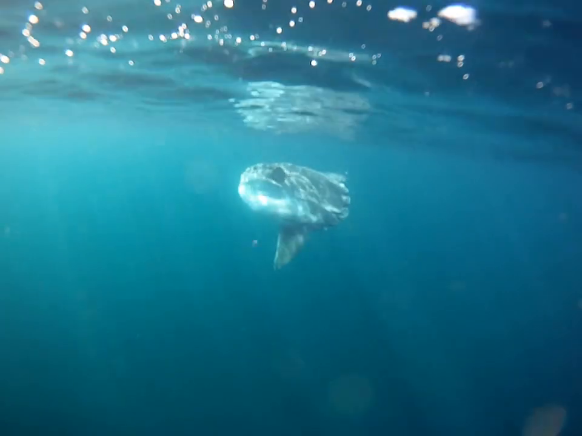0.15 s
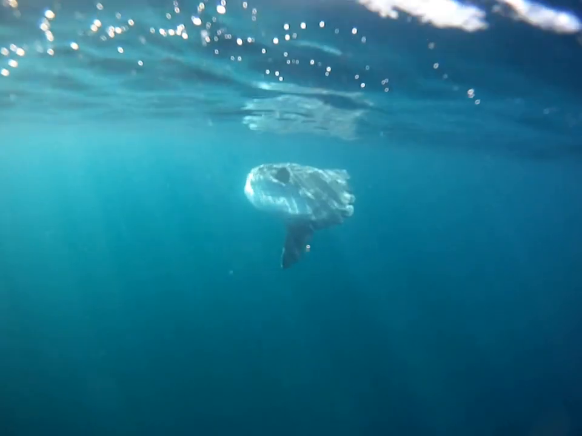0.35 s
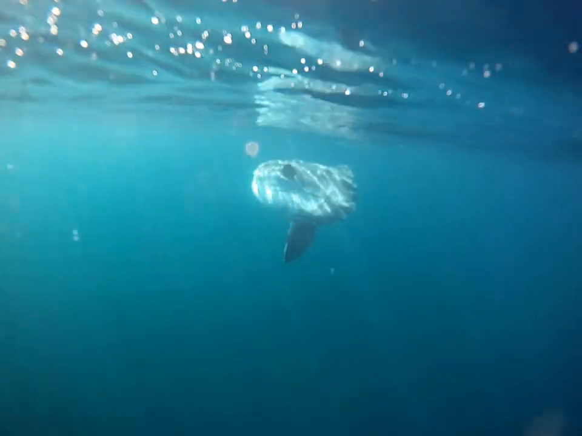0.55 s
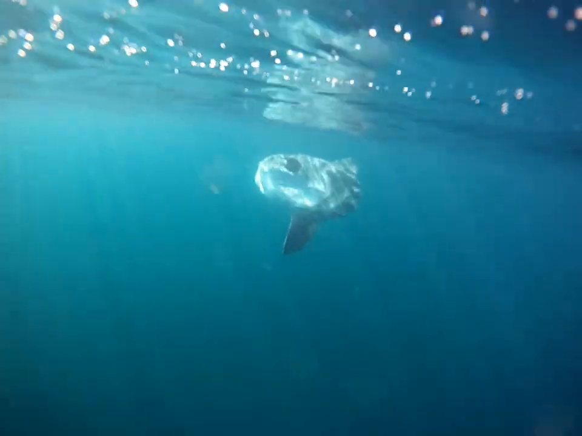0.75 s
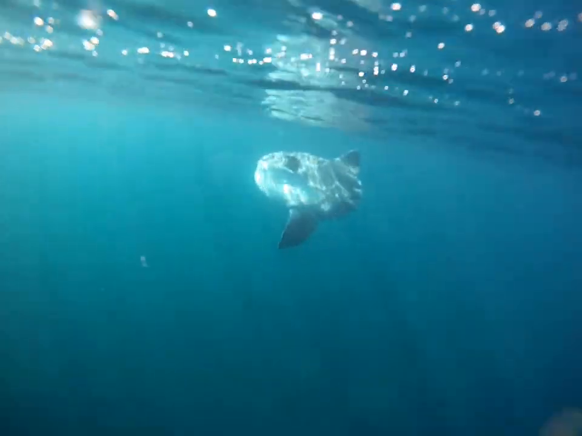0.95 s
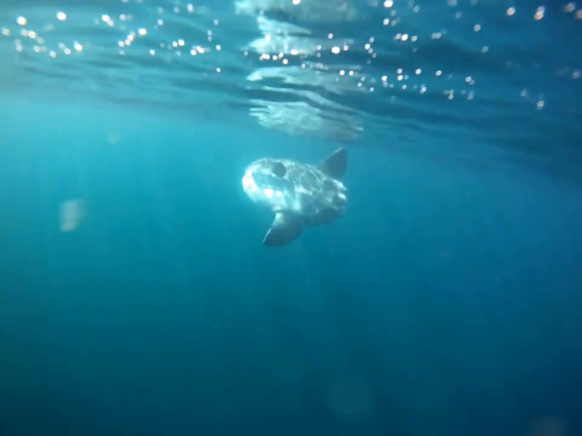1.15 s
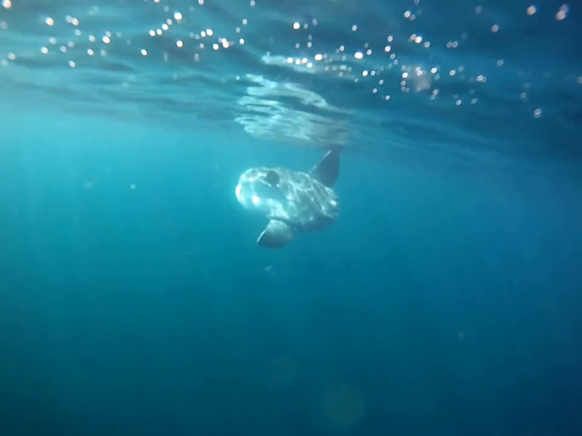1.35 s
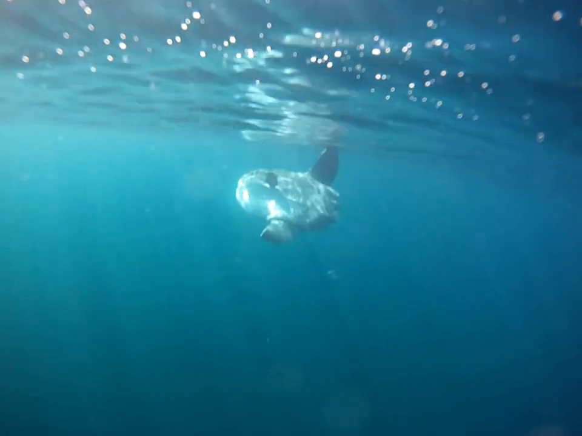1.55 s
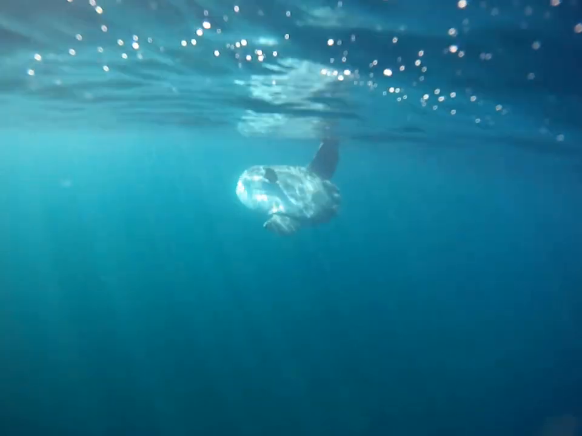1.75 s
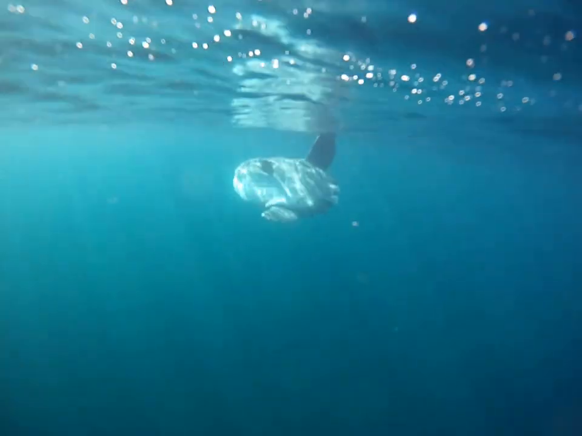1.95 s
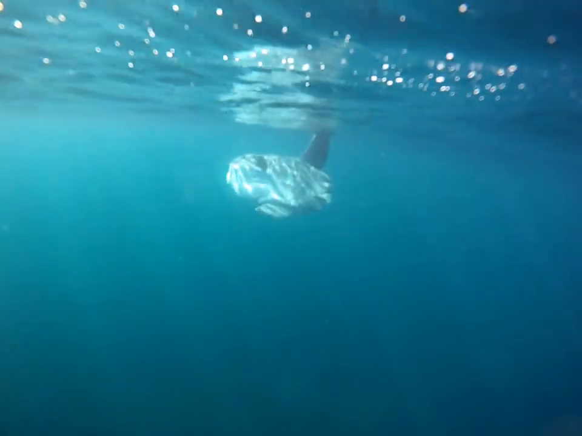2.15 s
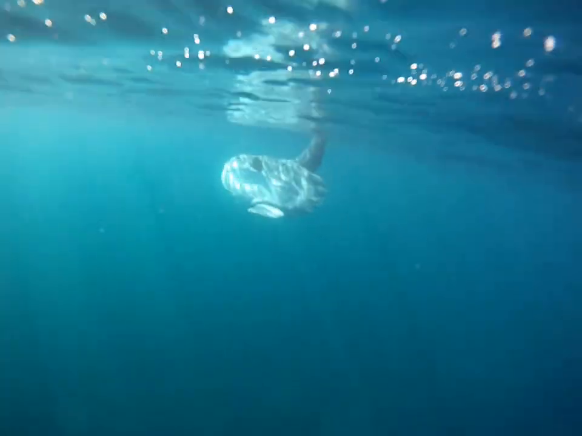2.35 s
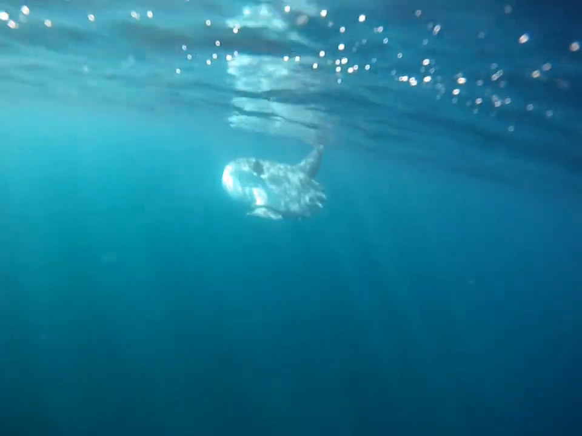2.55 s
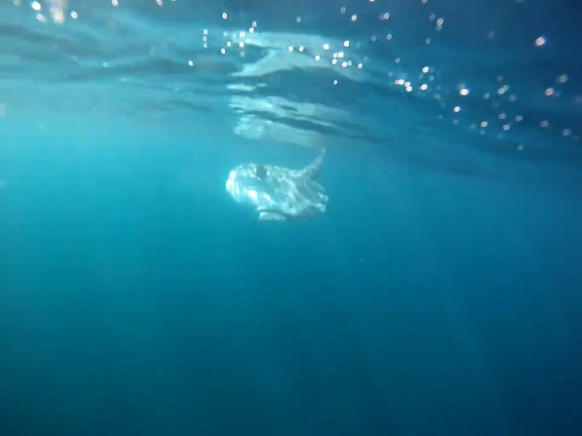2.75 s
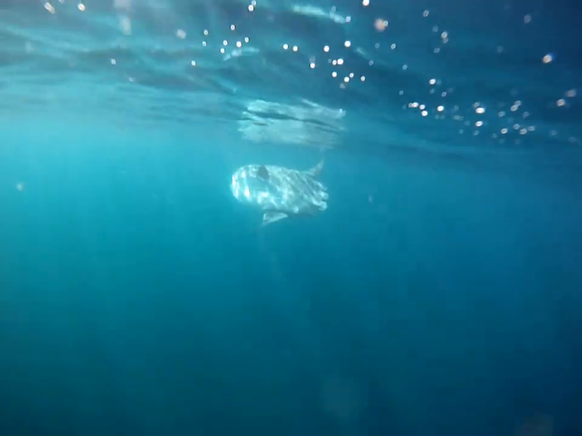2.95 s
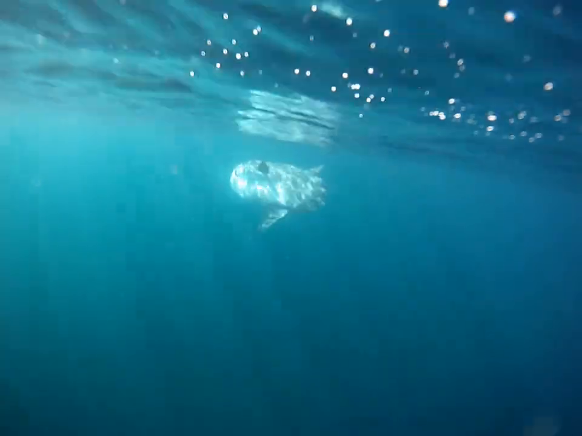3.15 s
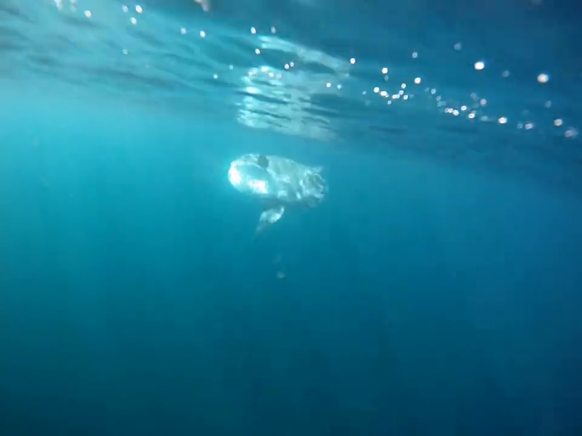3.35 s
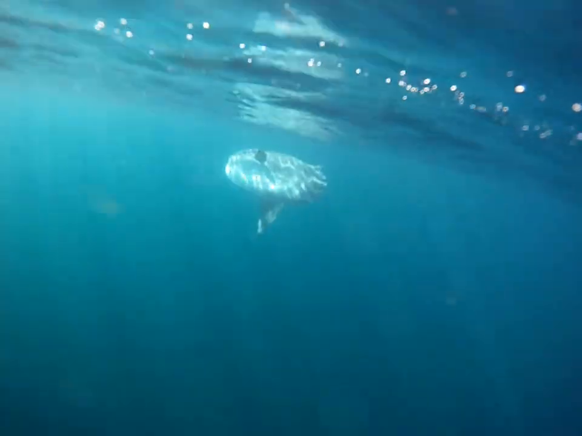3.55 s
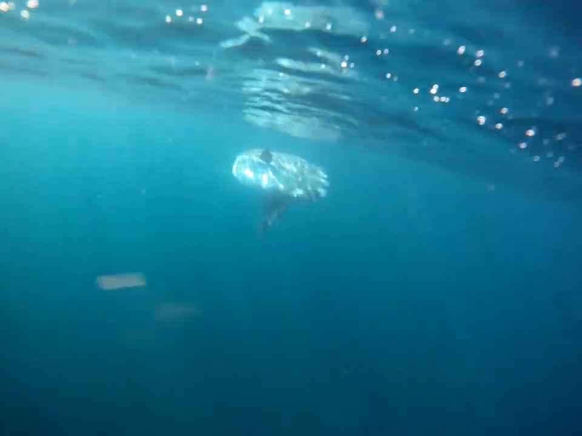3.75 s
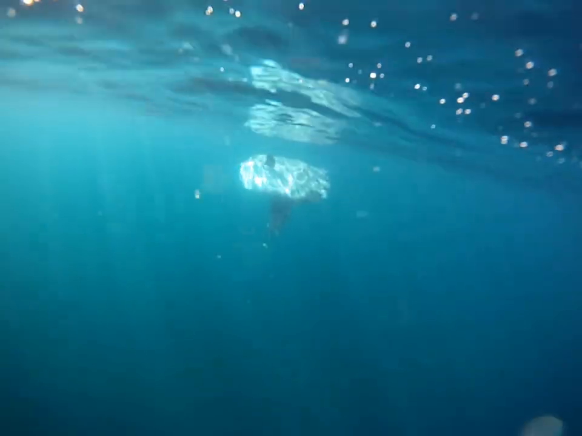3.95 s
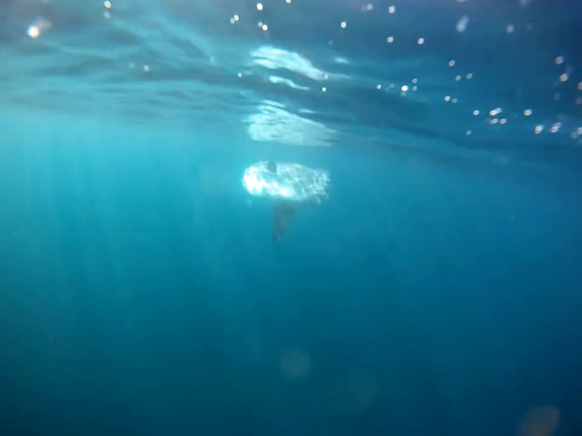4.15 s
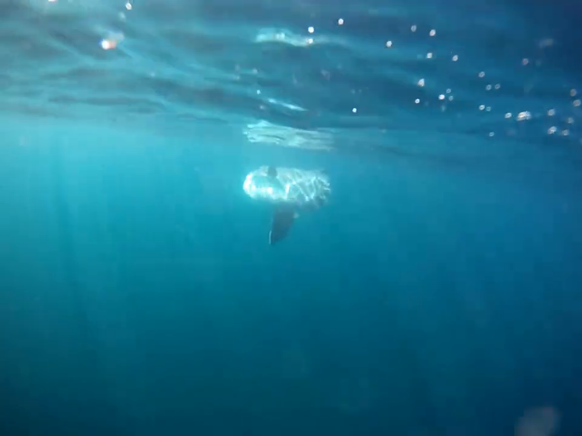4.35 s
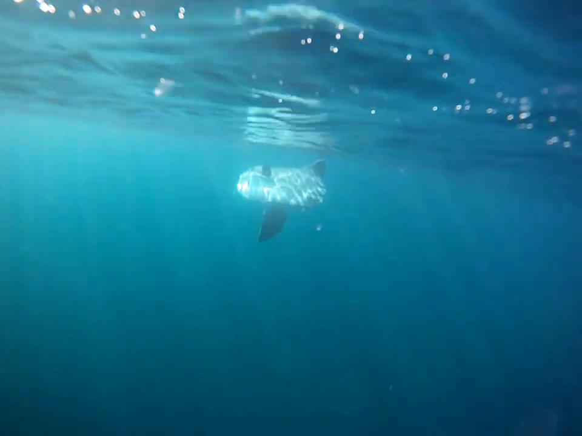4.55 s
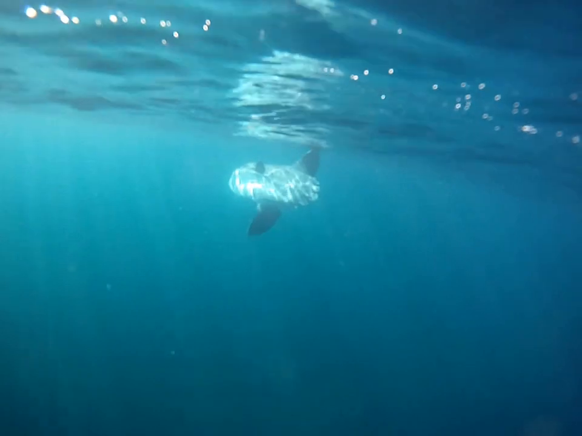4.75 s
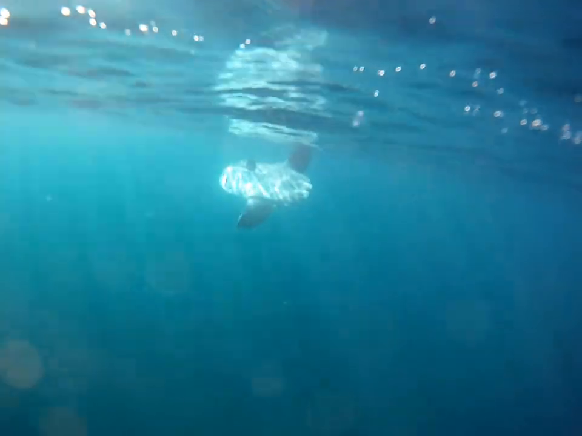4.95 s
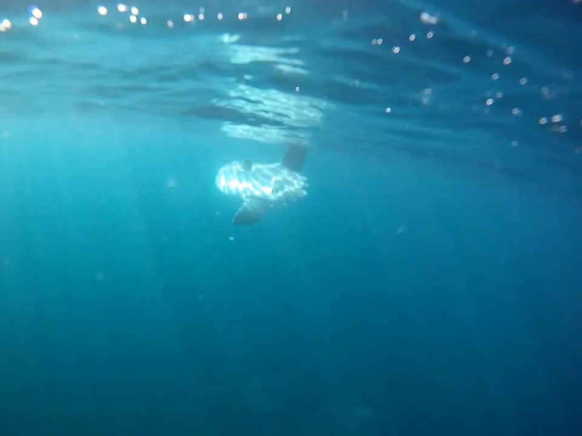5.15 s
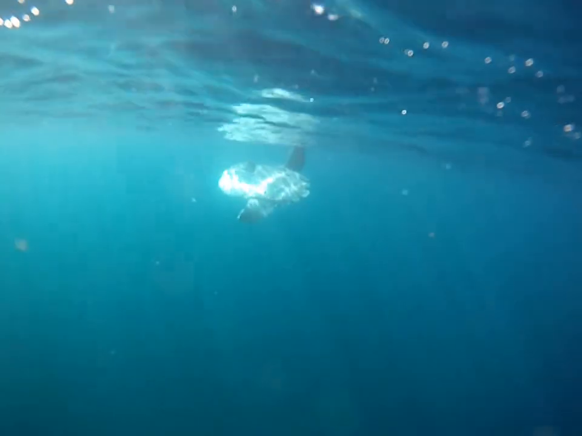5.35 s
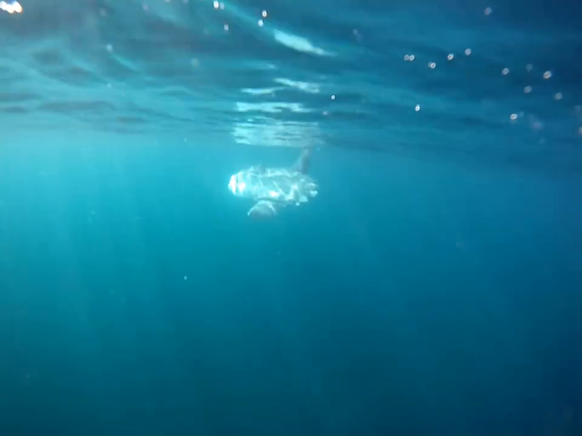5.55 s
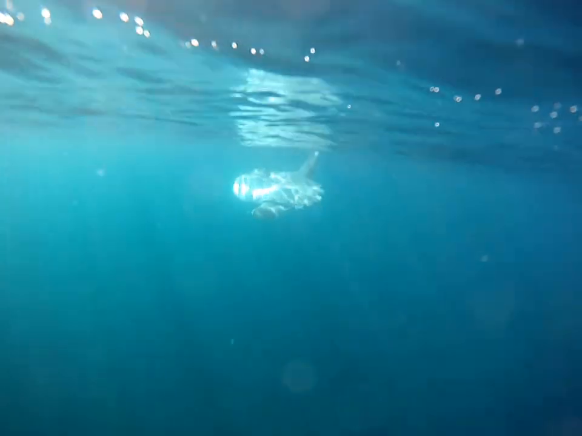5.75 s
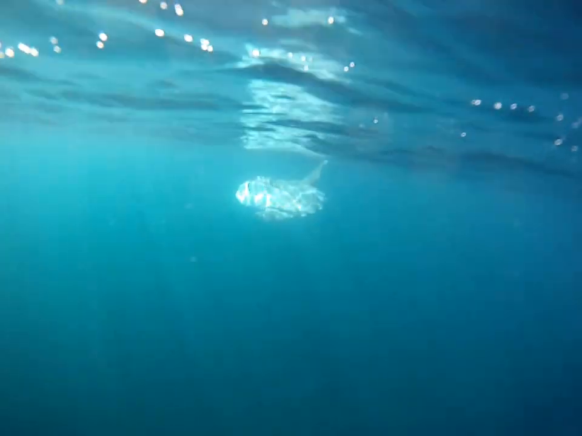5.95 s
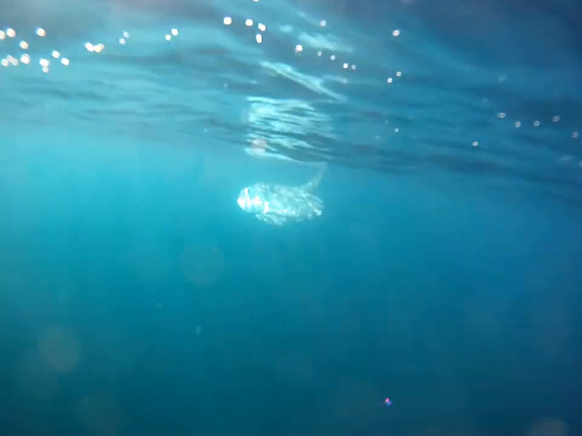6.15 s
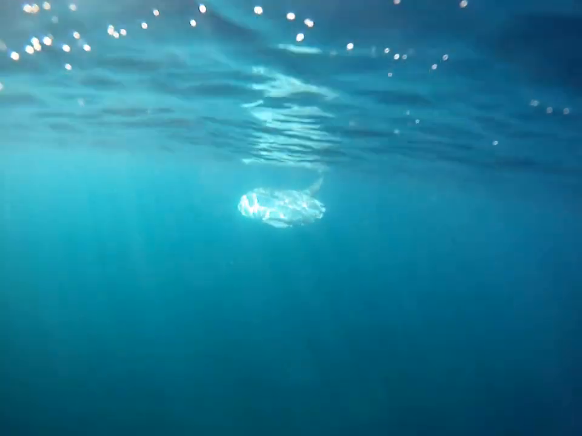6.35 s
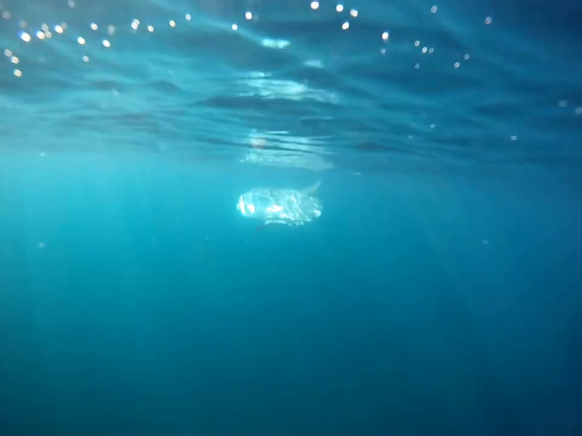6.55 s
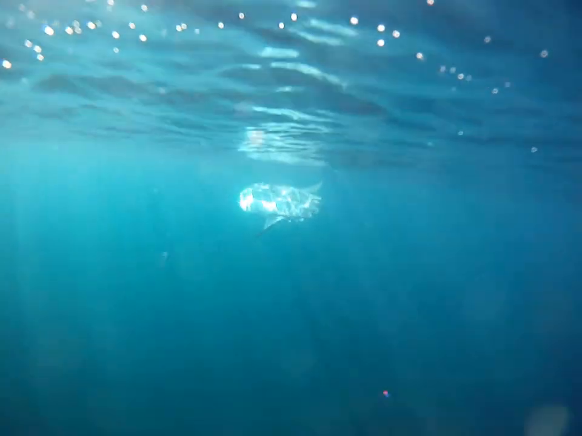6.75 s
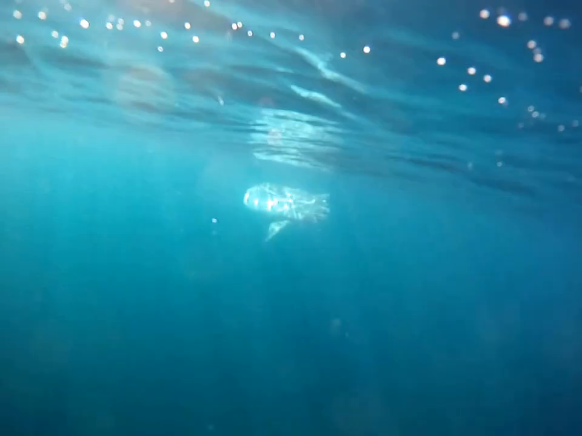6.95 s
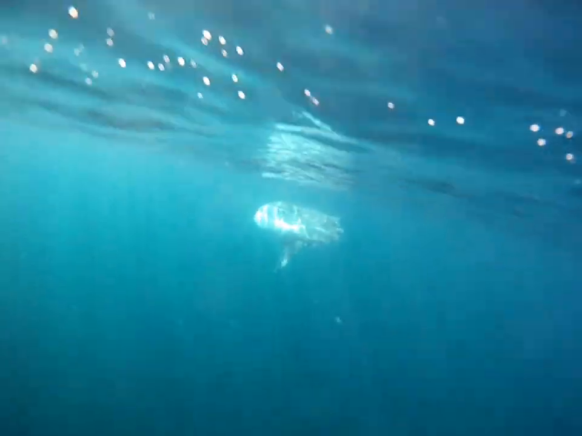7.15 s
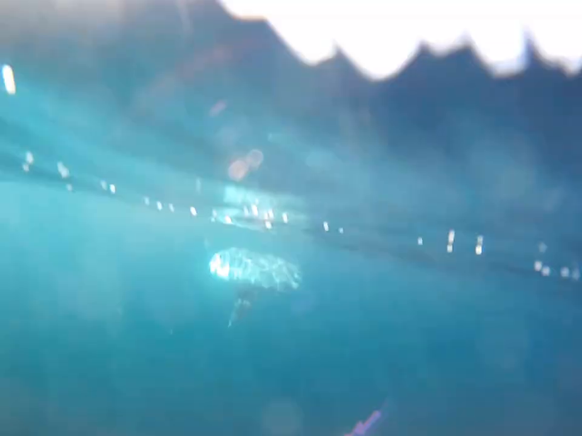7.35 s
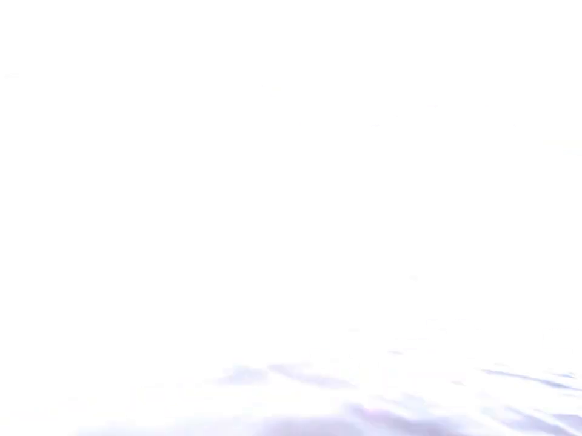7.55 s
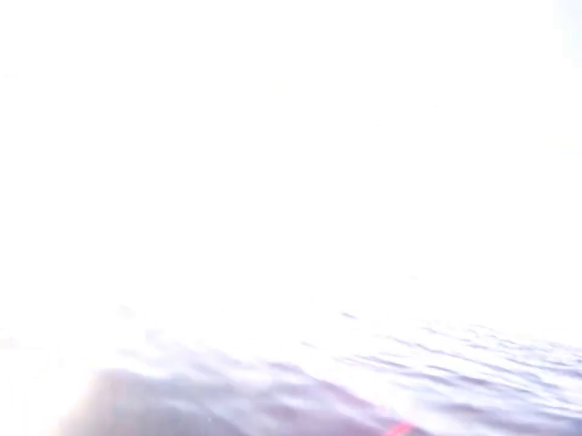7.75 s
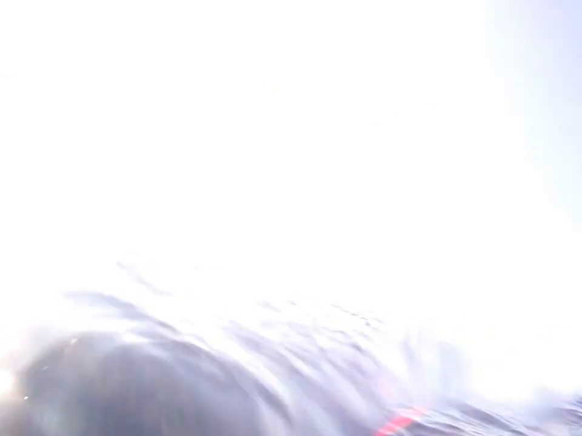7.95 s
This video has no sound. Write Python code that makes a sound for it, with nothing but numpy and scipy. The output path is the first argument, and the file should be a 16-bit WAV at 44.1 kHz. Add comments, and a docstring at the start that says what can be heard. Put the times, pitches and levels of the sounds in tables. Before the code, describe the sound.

A submerged microphone hears deep surging water and faint wash, a sharp click, then abrupt wet clacks and bubbling as it breaks the surface.

```python
"""Just under the sea surface beside a boat, a small camera in a sealed housing is held, then lifted out.
Noise driving resonances makes the swell's rumble and the water's hiss; knocks and heaves are damped low swings.
Water ticks on the shell; air pockets and short rings of the shell are gliding sines: a few early rings,
most around the lift. Fizz is many tiny ringing bubbles in spray and draining film; the seal pops twice as
the port clears. The recorder samples slowly and holds each sample."""
import sys
import numpy as np
from scipy import signal
from scipy.io import wavfile
from scipy.ndimage import uniform_filter1d

SR = 44100
rng = np.random.default_rng(int(sys.argv[2]) if len(sys.argv) > 2 else 0)


def bounce(signal):
    """Save signal as a 16-bit WAV file at the path given by the first command-line argument."""
    frames = np.transpose(np.atleast_2d(signal))
    limited = np.clip(frames, -1, 1)
    pcm = np.round(limited * 32767).astype(np.int16)
    wavfile.write(sys.argv[1], SR, pcm)


def field_ratio(decibels):
    """Amplitude ratio for a level in dB (20 dB per decade); scalars and array-likes work."""
    return 10 ** (np.asarray(decibels, dtype=float) / 20)


N = 356767  # length in samples, about 8.1 s

# the housing leaves the water: start and duration
LIFT_S, LIFT_TAKES_S = 7.3, 0.31


def lifted():
    """How far the housing is out of the water: 0 under water, 1 in air."""
    return np.clip((np.arange(N) / SR - LIFT_S) / LIFT_TAKES_S, 0, 1)


def rms_one(x):
    """Scale a sound to an average strength (rms) of 1."""
    return x / np.sqrt(np.mean(x ** 2) + 1e-20)


def in_time(rows):
    """Draw straight lines between the table's points, one curve for each column after the time."""
    s, *columns = np.transpose(rows)
    return [np.interp(np.arange(N) / SR, s, c) for c in columns]


def add(out, start_s, sound):
    """Mix a short sound into out at its start time, cutting it off at the end."""
    at = round(start_s * SR)
    out[at:at + len(sound)] += sound[:N - at]


def drift(rate_hz):
    """Slow random wandering of rms 1: noise at every 40th sample, smoothed twice, then joined by lines."""
    r = np.exp(-80 * np.pi * rate_hz / SR)
    noise = rng.standard_normal(N // 40 + 2002)
    slow = signal.lfilter([1], [1, -2 * r, r * r], noise)[2000:]  # drop the settling-in
    return np.interp(np.arange(N) / 40, np.arange(len(slow)), rms_one(slow))


def resonate(x, hz, width_hz):
    """A two-pole resonance that passes its own pitch at gain 1 and weakens the rest."""
    r = np.exp(-np.pi * width_hz / SR)
    gain = (1 - r * r) / 2
    return signal.lfilter(gain * np.array([1, 0, -1]), [1, -2 * r * np.cos(2 * np.pi * hz / SR), r * r], x)


def ring(x, hz, t60_s):
    """A unit click sets a sine of height 1 ringing; it falls 60 dB in t60_s."""
    r, w = field_ratio(-60 / (t60_s * SR)), 2 * np.pi * hz / SR
    return signal.lfilter([0, np.sin(w)], [1, -2 * r * np.cos(w), r * r], x + 1e-18)


def noise_in_modes(modes, lumpy_db, lump_rate_hz):
    """Separate noise drives each resonance; their wandering levels are partly shared; the sum has rms 1."""
    out, shared = 0, drift(lump_rate_hz)
    for hz, width_hz, db in modes:
        drive = rng.standard_normal(N + 8000)
        # two passes give steep skirts; each is wider, so that the pair has about the listed width
        once = resonate(drive, hz, 1.53 * width_hz)
        band = resonate(once, hz, 1.53 * width_hz)[-N:]
        lumps = 0.89 * shared + 0.5 * drift(lump_rate_hz)
        out = out + band * field_ratio(db + lumpy_db * lumps)
    return rms_one(out)


# push of the swell on the housing: time_s, push_db
SWELL_PUSH = [(0.0, -51), (0.06, -42), (0.43, -38), (0.45, -37.5), (0.59, -38.5), (1.02, -47),
              (1.85, -36.5), (2.5, -47.5), (2.54, -40.5), (3.36, -42), (3.64, -48.5), (4.19, -36.5),
              (4.84, -46.5), (5.16, -40), (5.63, -42.5), (5.71, -47.5), (5.75, -41), (6.32, -48.5),
              (6.99, -40.5), (7.3, -44.5)]
# resonances of the slow surge: pitch_hz, width_hz, relative_level_db
SURGE_RESONANCES = [(24.8, 9.2, -2), (41.3, 20, -2.5)]
# resonances of the wall layer: pitch_hz, width_hz, relative_level_db
WALL_RESONANCES = [(79.7, 13.7, -1), (98.63, 5.6, 5), (120.4, 13.4, -4.5)]
# resonances of the upper rumble: pitch_hz, width_hz, relative_level_db
UPPER_RESONANCES = [(156.2, 30, 1), (197.5, 51.6, -6), (234.2, 18.1, 0.5), (300, 43, -10.5)]
# resonances of the steadier wash above the rumble: pitch_hz, width_hz, relative_level_db
WASH_RESONANCES = [(375, 72, -3.5), (445, 90, 1), (573, 81, 0.5), (698, 120, -8.5)]
# each layer: level_db at a push of SWELL_MEAN_DB, share of the push's swing it follows, loss_db in air
SWELL_MEAN_DB = -43
SURGE, WALL, UPPER, WASH = (-49.5, 0.79, 0.97), (-45, 1, 13), (-46.5, 0.71, 11.5), (-61.5, 0.37, 8.7)


def rumble():
    """Turbulent pushes of the swell excite the low resonances of the housing."""
    push_db, = in_time(SWELL_PUSH)
    out_of_water = lifted()

    def loudness(level_db, share, loss_db):
        """Let one layer follow the push and weaken in air."""
        return field_ratio(level_db + share * (push_db - SWELL_MEAN_DB) - loss_db * out_of_water)

    surge = loudness(*SURGE) * noise_in_modes(SURGE_RESONANCES, lumpy_db=3.0, lump_rate_hz=11)
    wall = loudness(*WALL) * noise_in_modes(WALL_RESONANCES, lumpy_db=1.5, lump_rate_hz=7.5)
    upper = loudness(*UPPER) * noise_in_modes(UPPER_RESONANCES, lumpy_db=3.0, lump_rate_hz=16.6)
    wash = loudness(*WASH) * noise_in_modes(WASH_RESONANCES, lumpy_db=2.0, lump_rate_hz=8.3)
    return surge + wall + upper + wash


# hiss of the water before the loss in air: time_s, level_db
WATER_HISS = [(0.0, -57), (.5, -57), (1.1, -60), (1.6, -55.5), (2.35, -57), (2.78, -52.5), (3.45, -58),
              (4.25, -53.5), (5.0, -55), (5.9, -57.5), (6.35, -56), (7.04, -56.5)]
# resonances of the housing heard in the hiss: pitch_hz, width_hz, relative_level_db
SHELL_RESONANCES = [(861, 133, -8.5), (1380, 290, -6), (1764, 70, -5.5), (2070, 225, 0), (2370, 146, -6),
                    (2628, 213, -2), (3440, 380, -16.5), (3860, 1100, -19), (4800, 200, -17),
                    (5350, 360, -18)]
HISS_LOSS_DB = 20  # in air


def hiss():
    """Smooth water noise is coloured by the resonances of the shell."""
    level_db, = in_time(WATER_HISS)
    loudness = field_ratio(level_db - HISS_LOSS_DB * lifted())
    return loudness * noise_in_modes(SHELL_RESONANCES, lumpy_db=1.08, lump_rate_hz=2.3)


# dull knocks, and low heaves of the surge: start_s, level_db before build-up and decay, pitch_hz
KNOCKS_AND_HEAVES = [(.385, -27, 348), (.395, -26.5, 70), (.545, -26, 98), (.6, -33, 320),
                     (1.761, -22.5, 138), (1.901, -28, 300), (2.707, -24.5, 43.7), (3.022, -23.5, 59.5),
                     (5.109, -25.5, 43.7), (5.761, -32, 377), (7.0, -22.5, 45), (7.748, -39, 150),
                     (7.868, -37.5, 129), (7.943, -37, 200), (7.986, -35.5, 89)]
KNOCK_CYCLES = 10.1  # cycles to fall 60 dB


def knocks_and_heaves():
    """A soft push, building over about half a cycle, sets a low, heavily damped swing going."""
    out, ms = np.zeros(N), np.arange(12000) * 1000 / SR
    for start_s, db, hz in KNOCKS_AND_HEAVES:
        cycles = ms * hz / 1000
        swing = np.sin(2 * np.pi * cycles) * (1 - np.exp(-cycles / 0.4))
        add(out, start_s, field_ratio(db - 60 * cycles / KNOCK_CYCLES) * swing)
    return out


# ticks of water on the shell: start_s, peak_db, brightness in octaves above 1 kHz
SHELL_TICKS = [(1.14, -42, -0.2), (1.1702, -22, 1.37), (7.06, -31.5, 1), (7.1494, -32.5, 1.75),
               (7.2307, -44, 7), (7.287, -38, 2), (7.317, -15.5, 1.55), (7.3244, -33, 3),
               (7.3745, -18, -1.15), (7.3854, -32, -1.5), (7.4384, -26, 2.5), (7.446, -11, 0.4),
               (7.5155, -31, 1.5), (7.529, -37, 3), (7.539, -27, 3.5), (7.5522, -38, 6), (7.5603, -25.5, 2),
               (7.5688, -7.5, -0.1), (7.59, -33, 0.3), (7.599, -39, -1), (7.6151, -19.5, 4),
               (7.627, -21.5, 2.5), (7.639, -29, 1.2), (7.664, -36, -1.5), (7.6879, -43, 1.4),
               (7.705, -43, 1.1), (7.716, -36.5, 3), (7.7447, -46, 2.5), (7.7743, -39.5, 1.5),
               (7.794, -50, 1.5), (7.8204, -36.5, 2), (7.8524, -32, 3), (7.8604, -34, 2), (7.893, -39, 2.5),
               (7.9186, -39, 1), (7.9414, -49, 6), (7.976, -37, 3), (7.986, -44, 2), (8.0075, -43, -2.2),
               (8.021, -38, 2.5)]
# what a tick on the shell rings with: pitch_hz, relative_level_db, fall_s (time to fall 60 dB)
TICK_RESONANCES = [(620, -15.5, 0.0054), (1334, 6, 0.0084), (1950, 19, 0.0074), (2680, 6, 0.0069),
                   (3140, -6, 0.0067), (3530, 2, 0.01), (4270, -16, 0.0061), (4950, -10, 0.0052),
                   (5470, -4, 0.0051)]
TICK_NARROW_DB = 11  # loss of a mode one octave from the brightness, growing with the square
CONTACT_MS, CONTACT_HALVES_DB = 1.7, 21.5  # fade of a -35 dB tick's contact; it halves for so many dB more
# stray faint drops while the film drains: earliest start, middle level, most either way, how many
STRAY_FROM_S, STRAY_DB, STRAY_SPREAD_DB, STRAY_COUNT = 7.515, -50, 2, 9


def ticks():
    """A short ragged contact strikes the shell; a higher brightness favours the higher modes."""
    out, t = np.zeros(N), np.arange(1500) / SR
    when, loud, bright = rng.random((STRAY_COUNT, 3)).T
    stray_s = STRAY_FROM_S + when * (N / SR - STRAY_FROM_S)
    stray_db = STRAY_DB + STRAY_SPREAD_DB * (2 * loud - 1)
    strays = zip(stray_s, stray_db, 3 * bright)
    for start_s, db, brightness in list(SHELL_TICKS) + list(strays):
        contact_ms = CONTACT_MS * 0.5 ** ((db + 35) / CONTACT_HALVES_DB)
        contact = rng.standard_normal(len(t)) * np.exp(-t / (contact_ms / 1000))
        sound = np.zeros(len(t))
        for hz, mode_db, t60_s in TICK_RESONANCES:
            luck_db = rng.normal(0, 2.5)  # no two ticks sound alike
            loss_db = TICK_NARROW_DB * (np.log2(hz / 1000) - brightness) ** 2
            sound += field_ratio(mode_db + luck_db - loss_db) * ring(contact, hz, t60_s)
        add(out, start_s, field_ratio(db) * sound / np.abs(sound).max())
    return out


# small pockets while the film drains: level at STRAY_FROM_S, most either way, average delay, fade of later ones
SMALL_DB, SMALL_SPREAD_DB, SMALL_THIN_OUT_S, SMALL_FADE_DB_PER_S = -37, 4, 0.1, 40
# lowest pitch, range above it, rise time, cycles to fall 60 dB
SMALL_LOW_HZ, SMALL_OCTAVES, SMALL_RISE_MS, SMALL_CYCLES = 1100, 2.2, 1.1, 18
SMALL_GLIDE, SMALL_COUNT = 0.15, 30  # average upward glide in octaves per 10 ms; how many are drawn


def small_pockets():
    """Small pockets burst at random, thickest just after STRAY_FROM_S; rows as in POCKETS_AND_RINGS."""
    when, loud, pitch, bend = rng.random((SMALL_COUNT, 4)).T
    late_s = -SMALL_THIN_OUT_S * np.log(when)
    hz = SMALL_LOW_HZ * 2 ** (SMALL_OCTAVES * pitch)
    db = SMALL_DB - SMALL_FADE_DB_PER_S * late_s + SMALL_SPREAD_DB * (2 * loud - 1)
    rise_ms = np.full(SMALL_COUNT, SMALL_RISE_MS)
    fall_ms = 1000 * SMALL_CYCLES / hz
    rows = zip(STRAY_FROM_S + late_s, db, hz, rise_ms, fall_ms, 2 * SMALL_GLIDE * bend)
    return [row for row in rows if row[0] < N / SR]


# air pockets and short rings of the shell: start_s, level_db before flutter, pitch_hz at the end of the rise,
# rise_ms, fall_ms (time to fall 60 dB), glide in octaves per 10 ms
POCKETS_AND_RINGS = [(1.14, -37.5, 785, 0.97, 17, 0.018), (1.1701, -28, 1350, 1.9, 22, -0.025),
                     (1.1695, -22, 5550, 2.1, 12, 0.051), (4.034, -41.5, 4240, 1.1, 7.5, .03),
                     (4.601, -46, 3000, 1.1, 6, .03), (7.318, -30, 1216, 3.7, 29, 0.000039),
                     (7.375, -34, 1190, 1.1, 30, -0.068), (7.44, -24, 1990, 2.1, 21, -0.068),
                     (7.446, -7, 1710, 1.35, 19, -0.3), (7.483, -21.5, 946, 3.2, 34, -0.025),
                     (7.514, -24.5, 1700, 0.8, 5.3, .05), (7.519, -28.5, 1100, 2.5, 28, 0.19),
                     (7.533, -31, 2000, 2.2, 14, 0.037), (7.5681, -1, 1568, 4.42, 9.5, 0.24),
                     (7.569, -20, 2970, 2.8, 13, -0.05), (7.575, -12.5, 2030, 4, 34, 0.15),
                     (7.597, -19.5, 1260, 4.5, 25, 0.11), (7.611, -19, 2570, 0.89, 8, 0.053),
                     (7.629, -20.5, 2360, 0.51, 31, 0.051), (7.653, -38, 4580, 1.9, 14, .03),
                     (7.731, -41, 2240, 1.8, 14, 0.061), (7.842, -43, 3360, 1.5, 10, .03),
                     (7.894, -39, 2060, 1, 30, 0.017), (8.0188, -21.5, 1950, 1.7, 5.4, .3),
                     (8.027, -33, 2260, 2.4, 15, 0.079)]


def pockets_and_rings():
    """Each air pocket or short ring of the shell swells into a gliding sine, then dies."""
    out, ms = np.zeros(N), np.arange(3000) * 1000 / SR
    for start_s, db, hz, rise_ms, fall_ms, glide in list(POCKETS_AND_RINGS) + small_pockets():
        swell = np.sin(np.pi / 2 * np.clip(ms / rise_ms, 0, 1)) ** 2
        fade = field_ratio(-60 * np.maximum(ms - rise_ms, 0) / fall_ms)
        pitch = hz * 2 ** (glide * (np.minimum(ms, 25) - rise_ms) / 10)  # the glide stops after 25 ms
        tone = np.sin(2 * np.pi * np.cumsum(pitch) / SR)
        # a flutter in level roughens the tone, as the wet wall of a pocket does
        wobble = rms_one(uniform_filter1d(rng.standard_normal(len(ms)), size=70))
        add(out, start_s, field_ratio(db) * swell * fade * field_ratio(1.2 * wobble) * tone)
    return out


# bursts of fizz from spray and draining film: start_s, hold_s, level_db,
# commonest_pitch in octaves above 1 kHz
FIZZ_BURSTS = [(7.054, 0.045, -48, 1.4), (7.165, .03, -58.5, 2.1), (7.21, 0.14, -68, 1.2),
               (7.511, .045, -48.5, 2.3), (7.573, 0.066, -41.5, 1.2), (7.648, .03, -51.5, 1),
               (7.688, .28, -64, 1.2), (7.812, 0.01, -51, 1.5), (7.848, 0.01, -50, 1.2),
               (7.97, 0.013, -50, 2.2), (8.017, 0.064, -60.5, 2.1)]
FIZZ_ATTACK_S, FIZZ_RELEASE_DB_PER_S = 0.004, 898


def fizz():
    """Clumps of tiny bubbles burst in the spray and the draining film, each ringing for some cycles."""
    t = np.arange(N) / SR
    bursts = []
    for start_s, hold_s, db, _ in FIZZ_BURSTS:
        attack = np.clip((t - start_s) / FIZZ_ATTACK_S, 0, 1)
        release_db = FIZZ_RELEASE_DB_PER_S * np.maximum(t - start_s - hold_s, 0)
        bursts.append(attack * field_ratio(db - release_db))
    bursts = np.array(bursts)
    # the loudest burst of the moment sets both level and commonest pitch
    level, octave = bursts.max(axis=0), np.array(FIZZ_BURSTS)[bursts.argmax(axis=0), 3]
    sizes = field_ratio(3.3 * np.minimum(rng.exponential(1, N), 5)) * rng.choice([-1, 1], N)
    born = rng.random(N) < 6500 * field_ratio(3.0 * drift(60)) / SR  # around 6500 a second, in clumps
    pitches, dealt = np.geomspace(650, 5500, 18), rng.integers(0, 18, N)
    grains = np.zeros(N)
    for k, hz in enumerate(pitches):
        # bubbles near the commonest pitch carry most of the energy
        favour = field_ratio(-5.0 * (np.log2(hz / 1000) - octave) ** 2)
        grains += ring(sizes * born * (dealt == k) * favour, hz, 19.0 / hz)  # 19 cycles to fall 60 dB
    return level * rms_one(grains)


# the seal pops twice as the port clears: release_s, level_db before rounding, build_up_ms
SEAL_POPS = [(7.478, -13, 0.72), (7.4836, -14, 1.4)]


def pops():
    """Pressure builds up, lets go at once and swings back below rest; the rubber rounds the edge."""
    out, ms = np.zeros(N), np.arange(-400, 800) * 1000 / SR  # 0 ms is the release
    for release_s, db, build_ms in SEAL_POPS:
        build = np.exp(np.minimum(ms, 0) / build_ms - np.maximum(ms, 0) / 0.57)
        after = np.maximum(ms, 0) / 0.83
        swing_back = 1.9 * after * np.exp(-after)
        add(out, release_s - 400 / SR, field_ratio(db) * (build - swing_back))
    return signal.sosfilt(signal.butter(2, 1800, fs=SR, output="sos"), out + 1e-18)


def scene():
    """Add all the sounds together in one channel."""
    mix = rumble() + hiss() + fizz() + ticks() + pockets_and_rings() + knocks_and_heaves() + pops()
    return mix[None]


def band_limit(x):
    """A steep low-pass at the top of the band."""
    return signal.sosfilt(signal.butter(12, 16470, fs=SR, output="sos"), x)


HOLD = 4  # each 12 kHz sample is repeated to make 48 kHz


def record(dry):
    """Self-noise, rounded peaks and slow sampling; holding each sample mirrors the sound up the treble."""
    noisy = dry + field_ratio(-64.5) * rng.standard_normal(dry.shape)
    rounded = 1.3 * np.tanh(noisy / 1.3)
    smooth = signal.sosfilt(signal.butter(10, 5600, fs=SR, output="sos"), rounded)
    slow = signal.resample_poly(smooth, 40, 147, axis=1)  # 44.1 to 12 kHz
    held = np.repeat(slow, HOLD, axis=1)
    full = signal.resample_poly(held, 147, 160, axis=1)[:, :N]  # 48 to 44.1 kHz
    full = np.pad(full, ((0, 0), (0, N - full.shape[1])))
    full = signal.sosfilt(signal.cheby2(12, 60, 16600, fs=SR, output="sos"), full)
    return band_limit(full)


dry = scene()
out = record(dry)
bounce(out)
```